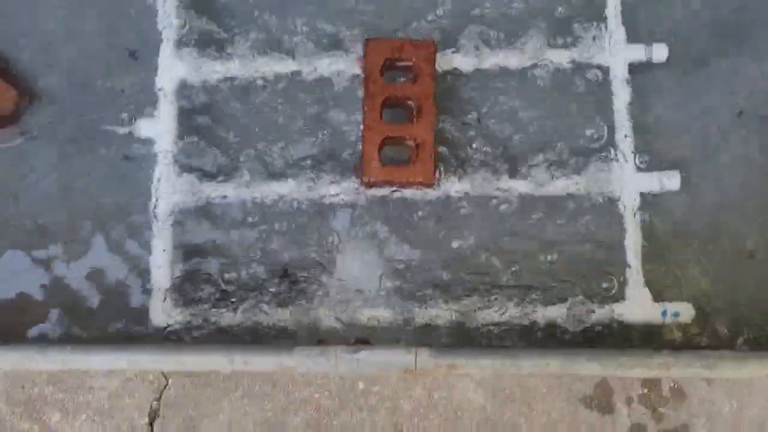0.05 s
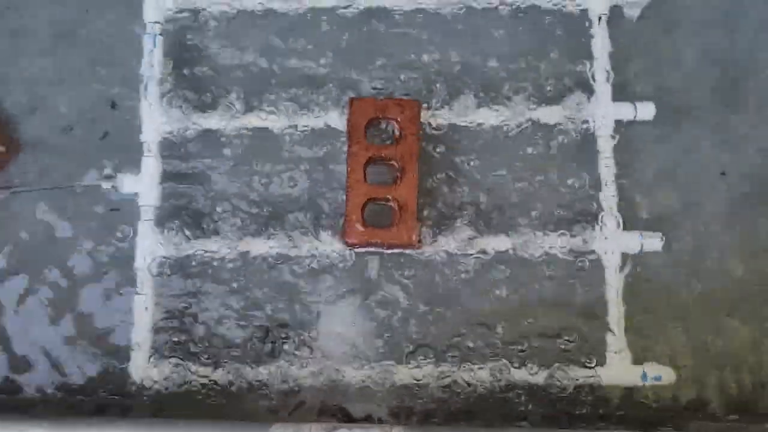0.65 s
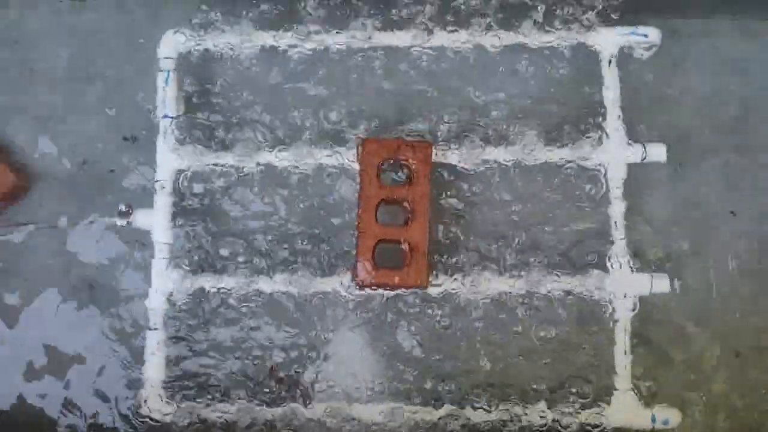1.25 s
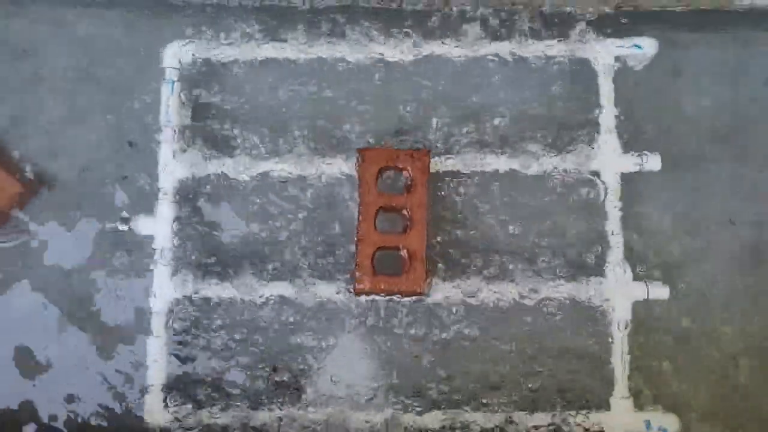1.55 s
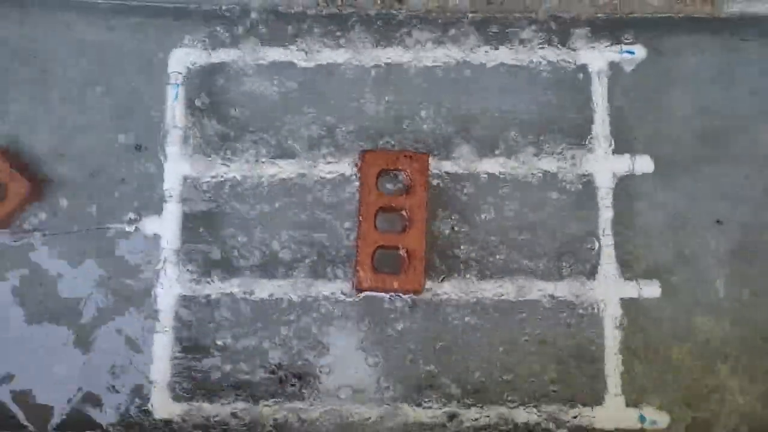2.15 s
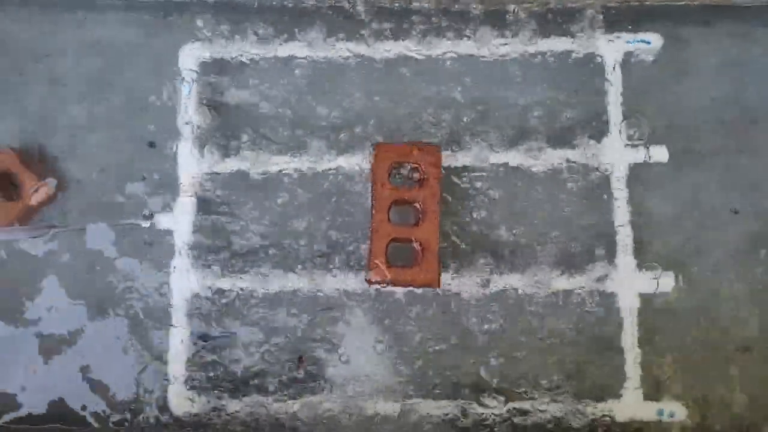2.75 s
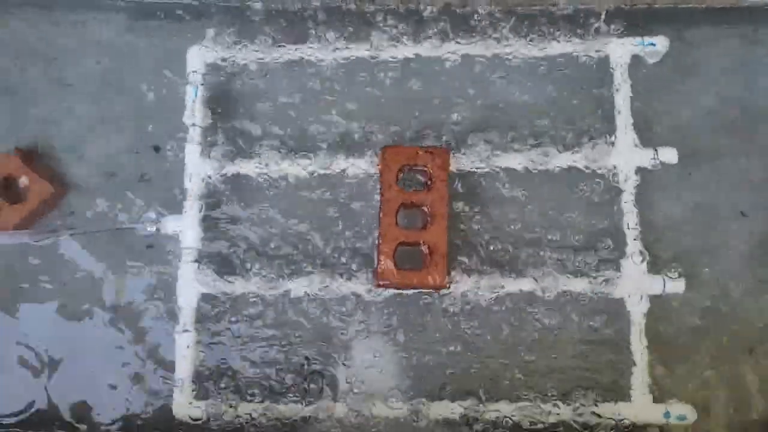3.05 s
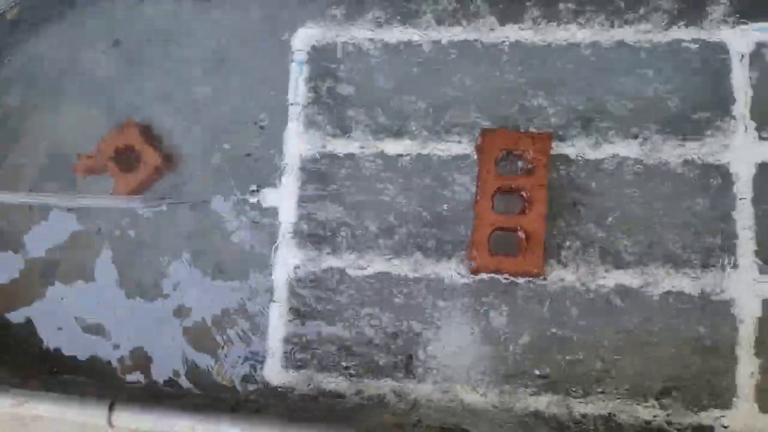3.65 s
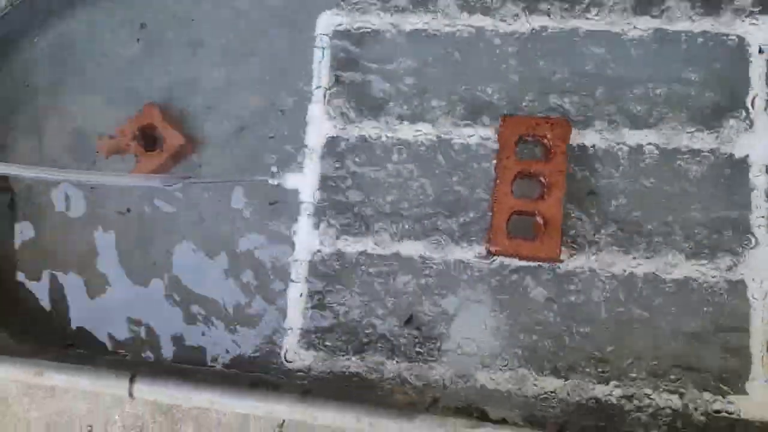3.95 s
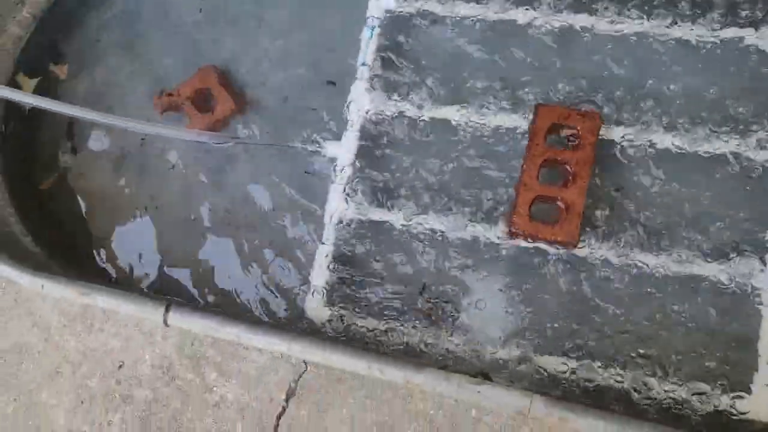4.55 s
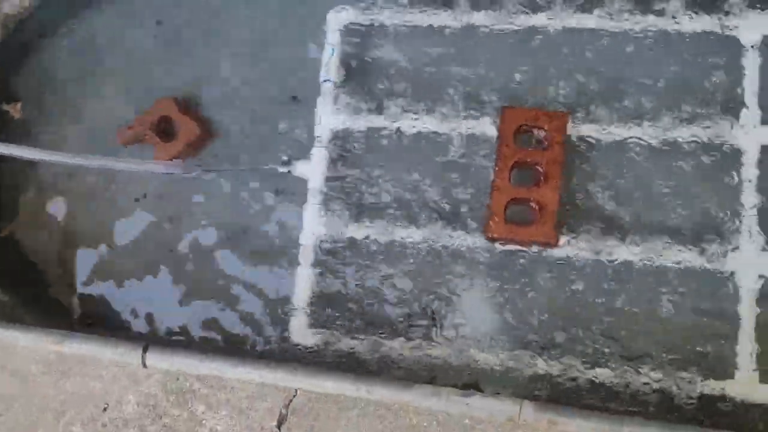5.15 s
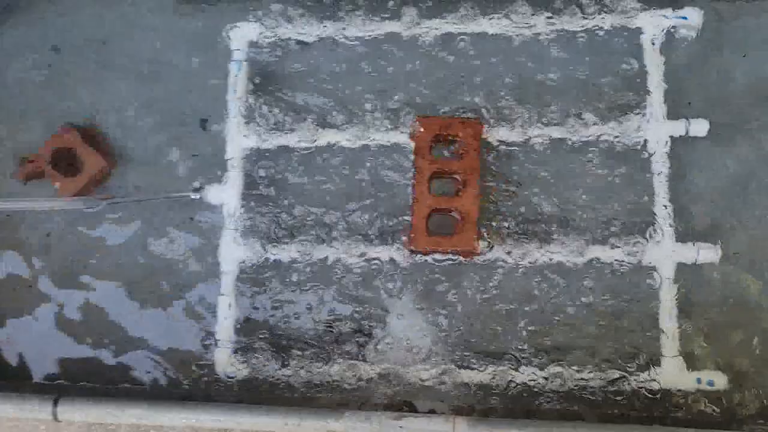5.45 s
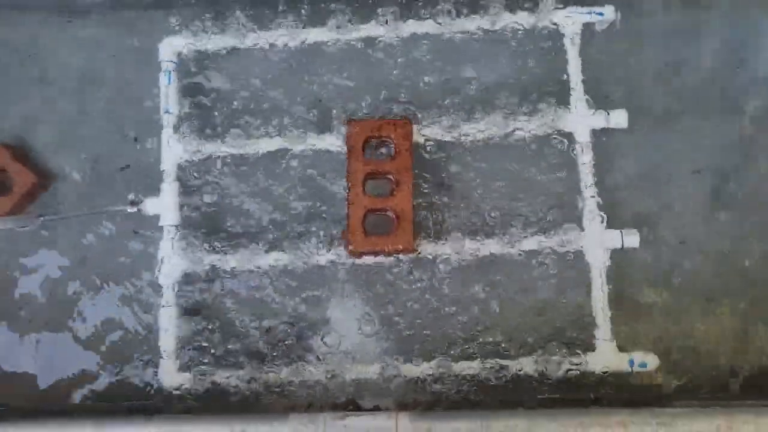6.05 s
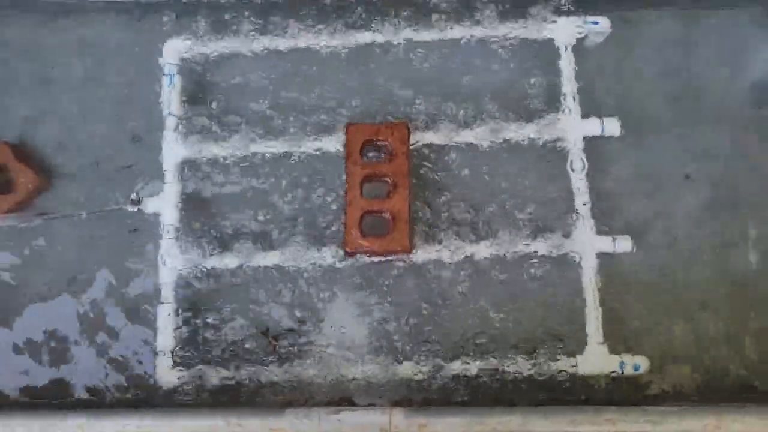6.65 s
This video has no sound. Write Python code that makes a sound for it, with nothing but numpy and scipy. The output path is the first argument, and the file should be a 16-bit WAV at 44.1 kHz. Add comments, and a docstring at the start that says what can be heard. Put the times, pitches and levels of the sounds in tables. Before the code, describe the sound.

Large bubbles churn continuously in an outdoor water tank while tiny ones plink and fizz at the surface, above a soft pump hum and rumble. Handling noise sits right on the phone's microphone: a quick run of hollow knocks, a droning finger rub, scattered bumps and a hard double knock past the middle. The sound ducks slightly after the hard knocks, and the last part is mostly gurgling.

```python
"""Bubbles gurgle in a shallow outdoor tank as air streams out of a perforated pipe frame.
Large ones ring low, small ones plink and fizz as they burst, and a small pump hums over a low rumble.
In front, knocks and finger strokes ring the case of the hand-held phone right at its two microphone
ports, and the hard knocks make its gain duck."""
import sys
import numpy as np
from scipy import signal
from scipy.fft import rfft, irfft
from scipy.io import wavfile
from scipy.ndimage import uniform_filter1d, minimum_filter1d

SR = 44100
rng = np.random.default_rng(int(sys.argv[2]) if len(sys.argv) > 2 else 0)


def master(y):
    """Save y as 16-bit WAV."""
    cut = np.clip(np.atleast_2d(y).T, -1, 1)
    pcm = np.round(cut * 32767)  # scale
    wavfile.write(sys.argv[1], SR, pcm.astype(np.int16))


N = 304731
TIME = np.arange(N) / SR

# knocks on the case, levels relative: start_s, thud_db, contact_db, centre_hz, ring_factor
KNOCK_CUES = [(0.187, 0.5, -32.5, 400, 0.17), (1.121, 11, -19.5, 310, 0.94), (1.226, 7.5, -27, 278, 0.87),
              (1.317, -1.5, -32.5, 260, 1), (1.366, 10.5, -20, 283, 0.88), (1.451, 10, -22.5, 200.5, 0.53),
              (1.535, -0.5, -40, 230, 0.67), (2.581, -2, -23.5, 300, 1.43), (2.867, 10.5, -20, 226, 0.93),
              (3.015, 3.5, -24, 240, 1), (3.172, -1.5, -33.5, 217, 1.65), (3.333, 0.5, -27, 218.5, 0.96),
              (3.471, -4.5, -38.5, 215, 0.23), (4.162, 13, -17, 178, 0.68), (4.244, 8, -31, 155, 0.53),
              (5.423, -2.5, -34, 420, 0.21)]


def undb(db):
    """Decibels to gain."""
    return 10 ** (np.asarray(db) / 20)


def unit(x):
    """Scale to rms 1."""
    return x / np.sqrt(np.mean(x ** 2))


def colour(x, eq):
    """Equalise along (freq_hz, gain_db) points."""
    hz, db = np.transpose(eq)
    bins_hz = np.maximum(np.fft.rfftfreq(x.shape[-1], 1 / SR), 1)
    return irfft(rfft(x) * undb(np.interp(np.log(bins_hz), np.log(hz), db)), x.shape[-1])


def resonate(x, hz, width_hz):
    """Two-pole resonance, gain 1 at the centre."""
    return signal.lfilter(*signal.iirpeak(hz, hz / width_hz, fs=SR), x)


def band(x, hz, width_hz):
    """The same resonance twice, for steeper skirts."""
    return resonate(resonate(x, hz, width_hz), hz, width_hz)


def walk(rate_hz):
    """Random wander with a spread near 1."""
    knots = rng.standard_normal(1024)
    return np.interp(TIME * rate_hz, np.arange(len(knots)), knots)


def stereo_noise(apart):
    """White noise at two ports; apart is the strength of what they do not share."""
    mid, side = rng.standard_normal((2, N))
    return unit(np.array([mid + apart * side, mid - apart * side]))


def decay_from(start_s, decay_s):
    """Envelope with an instant attack and an exponential tail."""
    return (TIME >= start_s) * np.exp(-abs(TIME - start_s) / decay_s)


def pump():
    """The pump hums near mains rate and its double, over a throbbing rumble."""
    # hum partials: pitch_hz, level_db, waver_db
    partials = [(59.2, -38, 5), (121.4, -40, 0)]
    # tone of the rumble: freq_hz, gain_db
    rumble_eq = [(13, -49), (22, -24), (54, 2), (70, 0), (91, -12), (107, -4), (124, -2.5), (146, -32),
                 (170, -12.5), (220, -46.5), (370, -120)]
    # fader ride of the rumble: time_s, level_db
    rumble_ride = [(0, -36.5), (1.25, -31.5), (1.8, -35.5), (2.9, -33.5), (4.3, -33.5), (5.25, -41.5),
                   (5.85, -36.5), (6.9, -37.5)]
    hum = sum(undb(db + waver_db * walk(2.7)) * np.sin(2 * np.pi * hz * TIME)
              for hz, db, waver_db in partials)
    rumble = unit(colour(stereo_noise(apart=0.62), rumble_eq))
    return hum + rumble * undb(np.interp(TIME, *np.transpose(rumble_ride)))


def bubbles(count, lo_hz, hi_hz, cycles, rise, spread_db, pan_db, lag_s):
    """A cloud of bubbles: each rings for some cycles and rises in pitch as it nears the surface."""
    out = np.zeros((2, N))
    for when, pitch, loud, place, sustain, lean in rng.random((count, 6)):
        hz = lo_hz * (hi_hz / lo_hz) ** pitch
        life_s = cycles * (.5 + sustain) / hz
        start = int(when * N)
        t = np.arange(min(int(life_s * SR), N - start)) / SR
        # its place in the tank decides which port it reaches first
        t_port = np.maximum(t - np.array([[1 - place], [place]]) * lag_s, 0)
        phase = 2 * np.pi * hz * t_port * (1 + rise * t_port / life_s / 2)
        note = np.sin(phase) * np.exp(-np.log(100) * t_port / life_s)
        nearness = -np.log(1 - .97 * loud)
        gain = hz * undb(spread_db * nearness + pan_db * (lean - .5) * np.array([[1], [-1]]))
        out[:, start:start + len(t)] += gain * note
    return unit(out)


def spray(level_db=-45.5):
    """Small bubbles chirp and plink, and their films burst at the surface in a fine fizz."""
    # tone of the spray: freq_hz, gain_db
    spray_eq = [(530, -11.5), (900, -2.5), (994, -13.5), (1100, -6.5), (1240, -9.5), (1380, -13.5),
                (1890, -19), (2110, -23), (2720, -21), (4720, -28.5), (7330, -34), (11400, -18.5),
                (12600, -21), (16400, -65.5), (22000, -120)]
    chirps = bubbles(900, 815, 1967, cycles=48, rise=.33, spread_db=5.5, pan_db=10, lag_s=.0004)
    plinks = bubbles(1100, 1900, 4600, cycles=50, rise=.12, spread_db=4, pan_db=9, lag_s=.0005)
    pops = bubbles(2200, 3200, 12200, cycles=26, rise=.04, spread_db=2, pan_db=14, lag_s=.00098)
    hiss = undb(-1 + 1.1 * walk(60)) * stereo_noise(apart=0.97)
    fizz = undb(-12) * chirps + undb(-14) * plinks + undb(-11.5) * pops + hiss
    return unit(colour(fizz, spray_eq)) * undb(level_db + walk(9.7))


def spits():
    """A bubble film bursts close by in a tiny bright tick."""
    # bursting films: start_s, level_db
    bursts = [(2.41, -53), (2.77, -51), (3.845, -43), (3.88, -46), (4.059, -44), (4.434, -46), (4.497, -42),
              (6.651, -44)]
    envelope = sum(undb(db) * decay_from(start_s, decay_s=0.0041) for start_s, db in bursts)
    return envelope * unit(band(stereo_noise(apart=0.51), hz=12000, width_hz=3500))


def gurgle(level_db=-27.5):
    """Steady air leaves the pipe holes as a dense stream of large bubbles that keep the tank ringing."""
    # tone of the gurgle: freq_hz, gain_db
    gurgle_eq = [(82, -35), (140, -23), (146, 0.5), (194, -10), (233, -6.5), (291, -11.5), (349, -5.5),
                 (394, -3), (430, -1.5), (497, -6), (612, 0.5), (793, -9), (1000, -29), (1100, -21),
                 (1430, -68.5), (2420, -120)]
    large = bubbles(7000, 172.3, 982.7, cycles=23.6, rise=.17, spread_db=.5, pan_db=5, lag_s=.00029)
    churn = large + undb(-2) * stereo_noise(apart=.3)
    standing_wave = undb(-5) * resonate(churn, hz=436, width_hz=17)
    return unit(colour(churn + standing_wave, gurgle_eq)) * undb(level_db + 0.13 * walk(5.7))


def glugs(first_octave_s=0.048, sweep_power=1.46, fade_power=3.85, left_bias_db=3):
    """A bubble swells as it nears the surface, then sweeps upward and thins out as its cavity opens."""
    # single bubbles that stand out of the wash: start_s, first_hz, length_s, level_db
    glug_cues = [(0.40, 679, 0.068, -26.5), (0.723, 650, 0.077, -24.5), (0.828, 562, 0.032, -18.5),
                 (0.945, 2590, 0.024, -45.5), (1.029, 3000, 0.02, -50), (1.772, 559, 0.029, -14),
                 (4.113, 474, 0.043, -15.5), (4.571, 516, 0.075, -20.5), (5.484, 590, 0.056, -18),
                 (6.136, 842, 0.051, -29), (6.264, 533, 0.033, -17), (6.527, 755, 0.05, -28.5)]
    out = np.zeros((2, N + SR))
    for start_s, first_hz, length_s, db in glug_cues:
        age = np.linspace(0, 1, int(length_s * SR))
        # the rippling surface shakes the pitch, and the loudness differently for each port
        ripple = np.array([np.interp(age, np.linspace(0, 1, 14), row)
                           for row in rng.standard_normal((3, 14))])
        octaves = (age * length_s / first_octave_s) ** sweep_power
        hz = first_hz * 2 ** octaves * (1 + .05 * ripple[2])
        swell = np.sin(np.pi * age) * (first_hz / hz) ** fade_power * (1 + 0.29 * ripple[:2])
        gain = undb(db + left_bias_db * np.array([[.5], [-.5]]))
        start = int(start_s * SR)
        out[:, start:start + len(age)] += gain * swell * np.sin(2 * np.pi * np.cumsum(hz) / SR)
    return out[:, :N]


def jolts():
    """A knock shakes the whole phone in the hand, which gives a short, deep shudder."""
    shake = sum(undb(thud_db - 35) * decay_from(start_s, decay_s=0.073)
                for start_s, thud_db, *_ in KNOCK_CUES)
    return shake * unit(band(stereo_noise(apart=0.94), hz=61, width_hz=45))


def finger_pressure(lift_s=0.011):
    """Each stroke swells, holds and dies away as the finger lifts."""
    # finger strokes on the case: start_s, swell_s, length_s, level_db
    strokes = [(1.265, 0.016, 0.47, -26), (1.753, 0.037, 0.26, -24.5), (2.02, 0.021, 0.43, -31),
               (2.399, 0.087, 0.14, -11), (2.57, 0.0094, 0.079, -11), (2.666, 0.017, 0.056, -14.5)]
    pressure = 0
    for start_s, swell_s, length_s, db in strokes:
        attack = np.clip((TIME - start_s) / swell_s, 0, 1) ** 2
        release = np.exp(-np.maximum(TIME - start_s - length_s, 0) / lift_s)
        pressure += undb(db) * attack * release
    return pressure


def rubbing(slips_per_s=900, slip_spread_db=2.5, scrape_db=-15):
    """Skin sticks and slips on the case: its low resonances drone and its high ones scrape."""
    # resonances under a sliding finger: pitch_hz, width_hz, left_db, right_db
    rub_modes = [(257.3, 18, -2.5, 12.5), (320.6, 97, 5.5, 1.5), (437.8, 24.6, 15, -2), (1036, 130, -4, 6),
                 (1205, 85, -3, 2), (1930, 240, -25, -22), (2920, 1000, -48, -53.5)]
    slips = (rng.random(N) < slips_per_s / SR) * undb(slip_spread_db * rng.standard_normal(N))
    voices = [band(slips, hz, width_hz) * undb([[left_db], [right_db]])
              for hz, width_hz, left_db, right_db in rub_modes]
    drone = unit(sum(voices[:3]))
    left, right = unit(sum(voices[3:]))
    scrape = np.array([np.roll(left, int(0.0003 * SR)), right])  # reaches the left port late
    return (drone + undb(scrape_db) * scrape) * finger_pressure()


def case_ring(force, modes, ring_factor, centre_hz, grip_db_per_octave, left_lead_rad):
    """Case modes driven by a contact force; the grip favours those near a centre pitch."""
    t = np.arange(len(force)) / SR
    response = 0
    for hz, t60_s, left_db, right_db in modes:
        grip_db = -grip_db_per_octave * abs(np.log2(hz / centre_hz))
        detune = 1 + 0.015 * rng.standard_normal()
        phase = 2 * np.pi * hz * detune * t + np.array([[left_lead_rad], [0]])
        gain = undb(grip_db + np.array([[left_db], [right_db]]))
        response += gain * np.sin(phase) * np.exp(-np.log(1000) * t / (t60_s * ring_factor))
    ring = signal.fftconvolve(response, force[None], axes=1)[:, :len(t)]
    return ring / np.sqrt(np.mean(ring[:, :SR // 30] ** 2))  # rms 1 over the attack


def bounces(hard_db=10, delay_s=0.028):
    """A hard knock bounces once: later, weaker and with a softer contact."""
    return [(start_s + delay_s, thud_db - 8.5, contact_db - 10.5, centre_hz, ring_factor)
            for start_s, thud_db, contact_db, centre_hz, ring_factor in KNOCK_CUES if thud_db > hard_db]


def knocks(chatter_s=0.0081, thud_attack_s=0.011, contact_attack_s=0.0015):
    """A sharp contact and a short chatter of the loose case set off a thud, a clack and a crack."""
    # low modes of the case: pitch_hz, base_t60_s, left_db, right_db
    thud_modes = [(153, 0.04, -17.5, -11), (179, 0.21, -1, -7), (217, 0.36, -3.5, 1), (248.8, 0.17, 1, 10),
                  (263.1, 0.22, 6, -5.5), (307, 0.18, 2, 0.5), (337.7, 0.14, -2, 1),
                  (417.7, 0.14, 9.5, -9.5), (433.6, 0.22, 3, -3.5)]
    # high modes, which push the ports in roughly opposite senses: pitch_hz, t60_s, left_db, right_db
    clack_modes = [(803, 0.11, -1, 5.5), (1025, 0.047, -12.5, 10), (1091, 0.081, -12, 4),
                   (1150, 0.024, -24, -12), (1395, 0.035, -18, -9.5), (1680, 0.045, -11, -9.5),
                   (1876, 0.045, -12, -15), (1790, 0.036, -8, -5), (2130, 0.031, -18.5, -16),
                   (3400, 0.04, -18.5, -32)]
    # tone of the contact noise: freq_hz, gain_db
    crack_eq = [(300, -7), (600, 17.5), (1200, 13), (1550, -10), (2000, -7.5), (2700, -15), (3600, -11),
                (5500, -38), (12000, -53)]
    out = np.zeros((2, N + SR))
    t = np.arange(SR // 2) / SR
    for start_s, thud_db, contact_db, centre_hz, ring_factor in KNOCK_CUES + bounces():
        ring_factor = max(ring_factor, .2)
        force = 0.022 * rng.standard_normal(len(t)) * np.exp(-t / chatter_s)
        force[0] += 1  # the contact itself
        thud = case_ring(force, thud_modes, ring_factor, centre_hz,
                         grip_db_per_octave=7.5, left_lead_rad=0.11)
        clack = case_ring(force, clack_modes, 1, centre_hz, grip_db_per_octave=0, left_lead_rad=3.8)
        mid, side = rng.standard_normal((2, len(t)))
        crack = unit(colour(0.71 * mid + np.array([side, -side]), crack_eq))
        crack *= np.exp(-t / (0.059 * ring_factor))
        # the heavy parts take some milliseconds to get going, the light ones far less
        thud *= 1 - np.exp(-t / thud_attack_s)
        contact = (undb(4.5) * clack + undb(-5) * crack) * (1 - np.exp(-t / contact_attack_s))
        # a bright snap at the first touch pushes the two ports in opposite senses
        snap = unit(band(rng.standard_normal(len(t)), hz=1750, width_hz=1050)) * np.exp(-t / 0.002)
        contact += undb(-8) * snap * np.array([[1], [-0.35]])
        start = int(start_s * SR)
        out[:, start:start + len(t)] += undb(thud_db - 6) * thud + undb(contact_db) * contact
    # a small case radiates no deep bass
    return signal.sosfilt(signal.butter(3, 110, "high", fs=SR, output="sos"), out[:, :N])


def scene():
    """Water and pump, coloured differently at each port, with the handling on top."""
    # stereo balance of the bed: freq_hz, left_minus_right_db
    balance = [(60, -2), (200, 0), (400, 2.5), (600, 3.5), (1300, 4.5), (2200, 0), (4200, -4), (5200, 2),
               (6500, -7), (7900, -6.5), (9500, -4), (12000, -3.5)]
    left, right = gurgle() + spray() + pump()
    bed = np.array([colour(left, [(hz, db / 2) for hz, db in balance]),
                    colour(right, [(hz, -db / 2) for hz, db in balance])])
    return bed + glugs() + spits() + knocks() + jolts() + rubbing()


def gain_control(x, threshold_db=-7, deepest_cut_db=7, hold_s=1.086, recover_db_per_s=6.5):
    """A loud moment turns the gain down at once; it stays down for a while, then creeps back."""
    power = uniform_filter1d(np.mean(x ** 2, axis=0), SR // 30)
    wanted_db = np.clip(threshold_db - 10 * np.log10(power + 1e-12), -deepest_cut_db, 0)
    hold = int(hold_s * SR)
    held_db = minimum_filter1d(wanted_db, hold, origin=(hold - 1) // 2, mode="constant")
    recovery_db = recover_db_per_s * TIME
    return x * undb(np.minimum.accumulate(held_db - recovery_db) + recovery_db)


def record(dry):
    """The phone ducks after hard knocks, rounds the highest peaks and cuts the top."""
    ducked = gain_control(dry)
    rounded = ducked / (1 + ducked ** 8) ** (1 / 8)
    return signal.sosfiltfilt(signal.ellip(10, .1, 60, 12650, fs=SR, output="sos"), rounded)


dry = scene()
out = record(dry)
master(out)
```